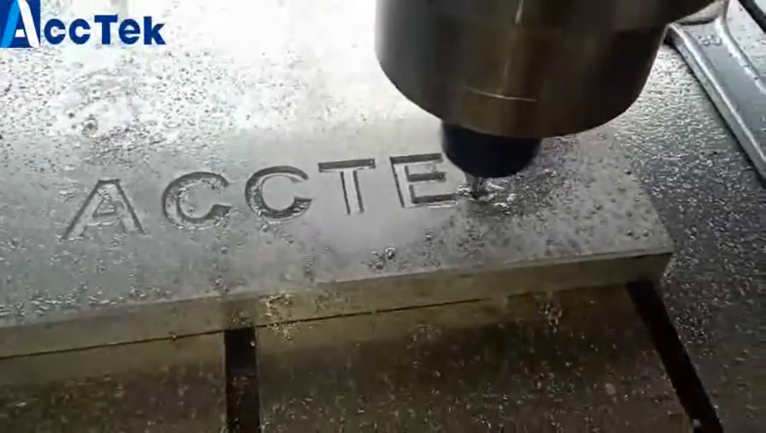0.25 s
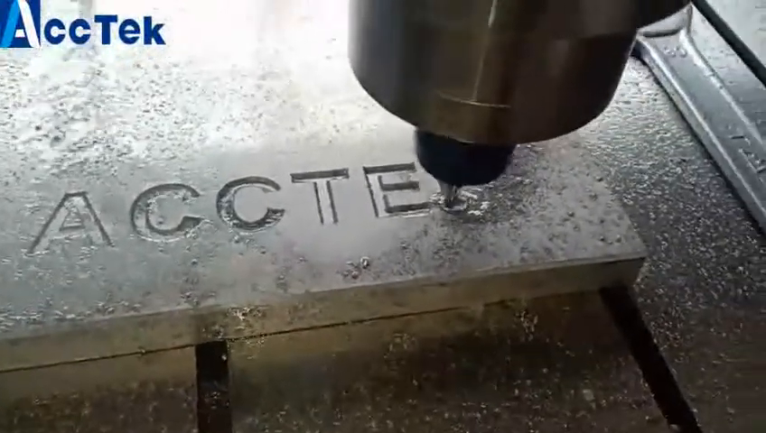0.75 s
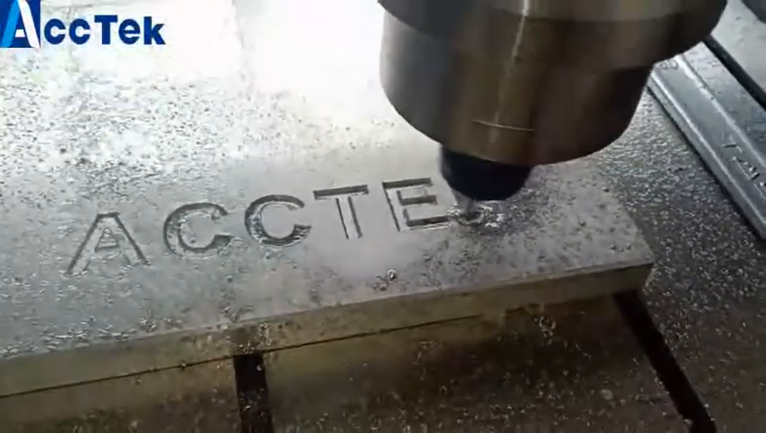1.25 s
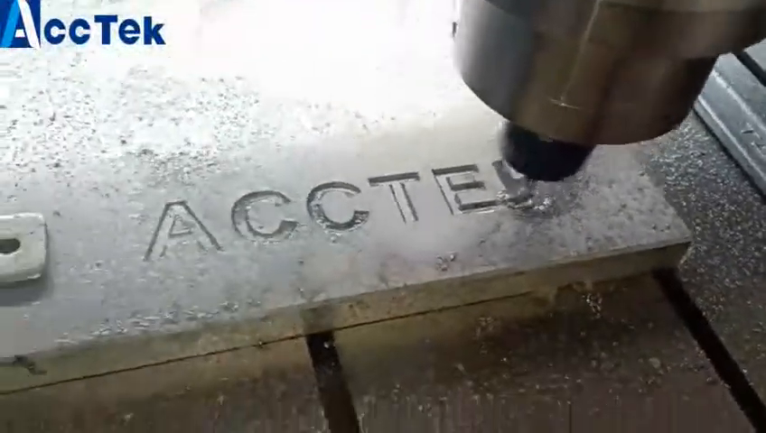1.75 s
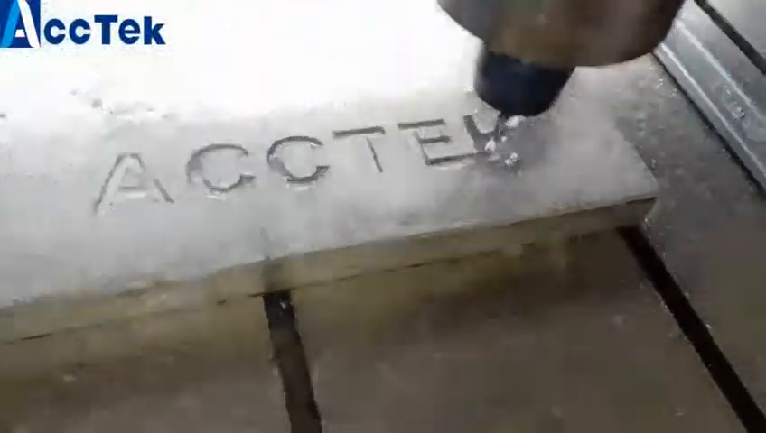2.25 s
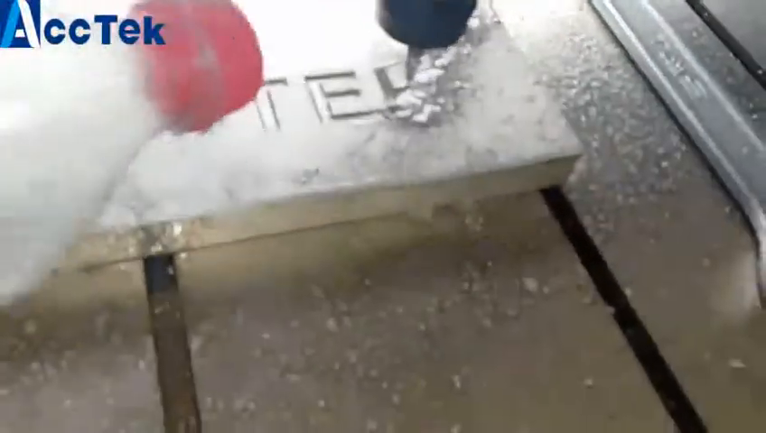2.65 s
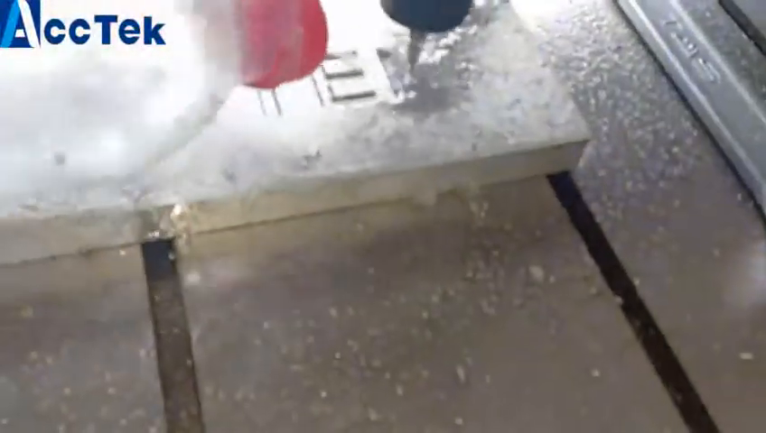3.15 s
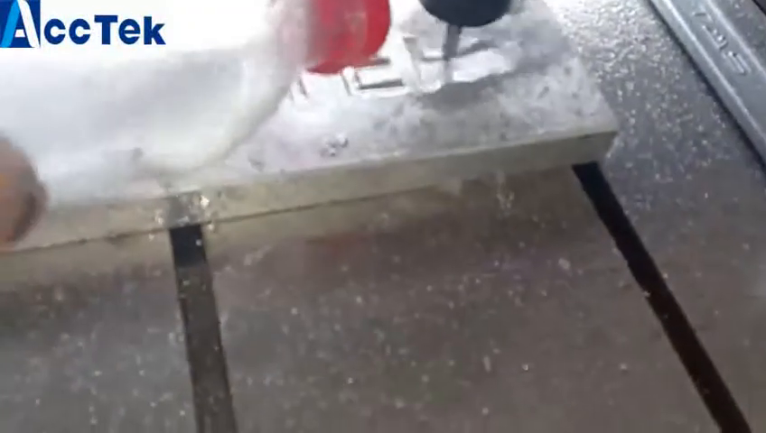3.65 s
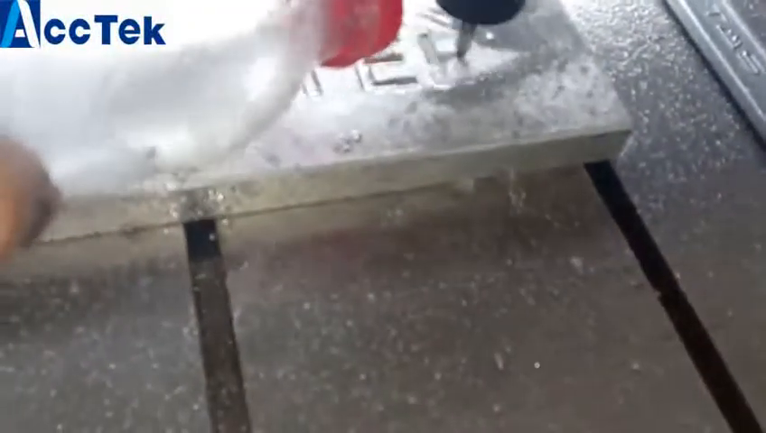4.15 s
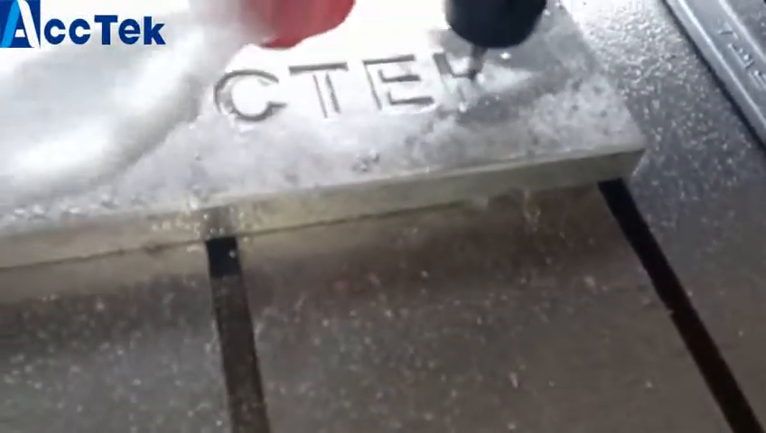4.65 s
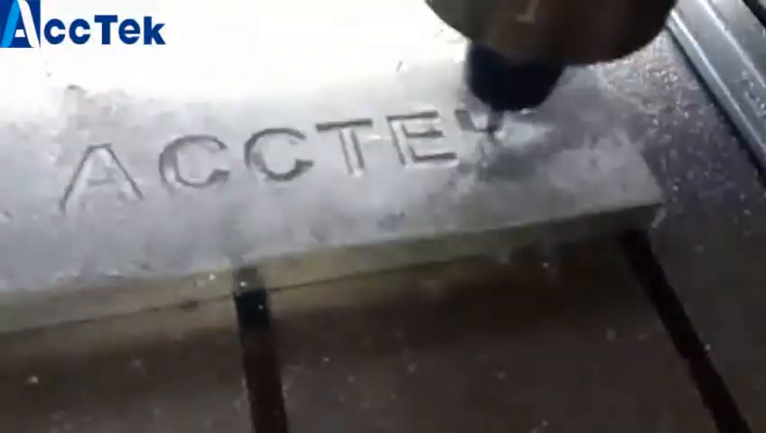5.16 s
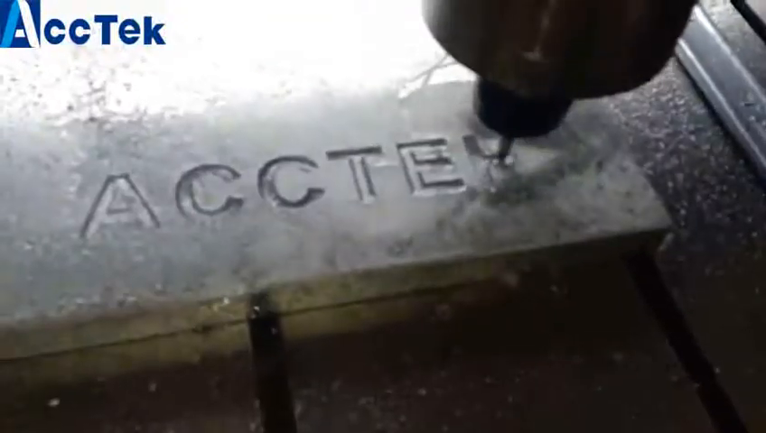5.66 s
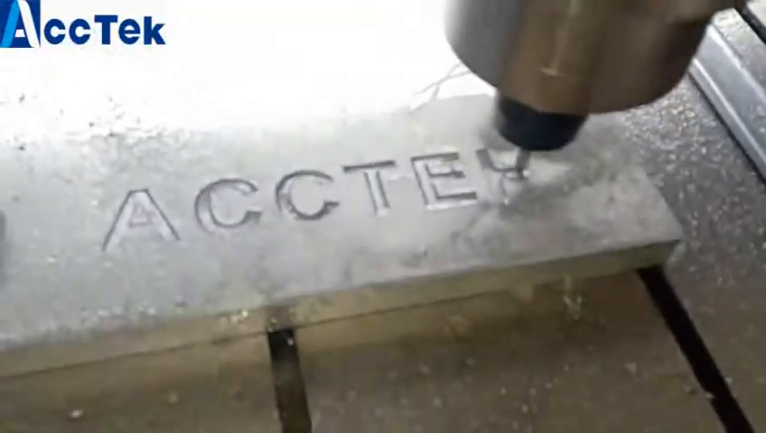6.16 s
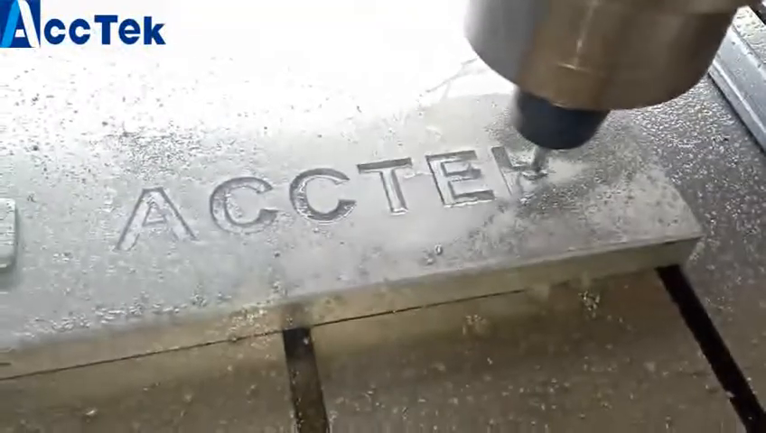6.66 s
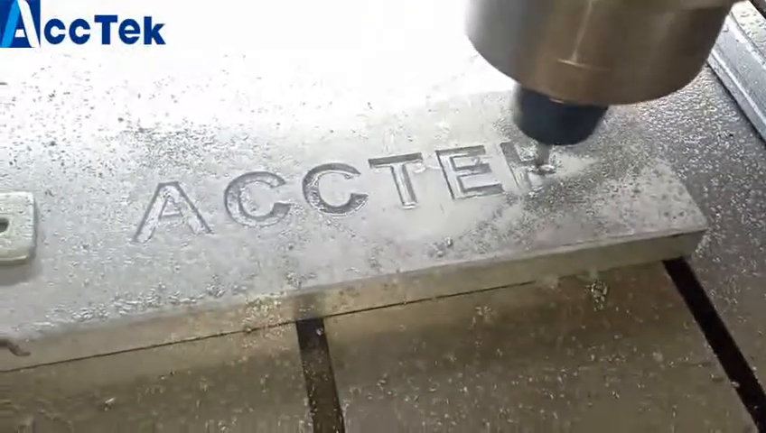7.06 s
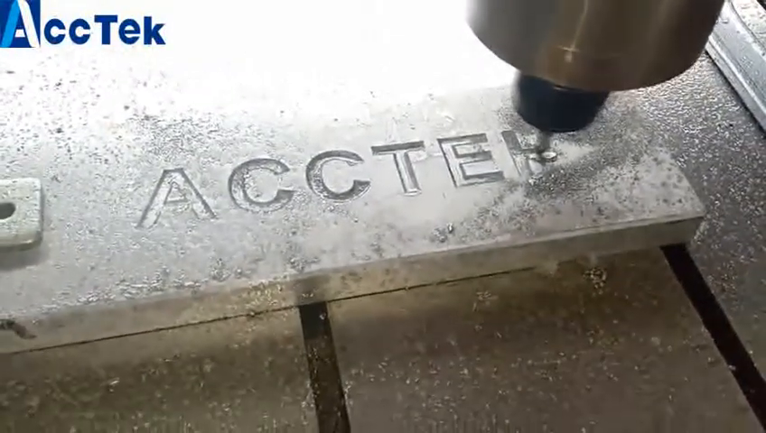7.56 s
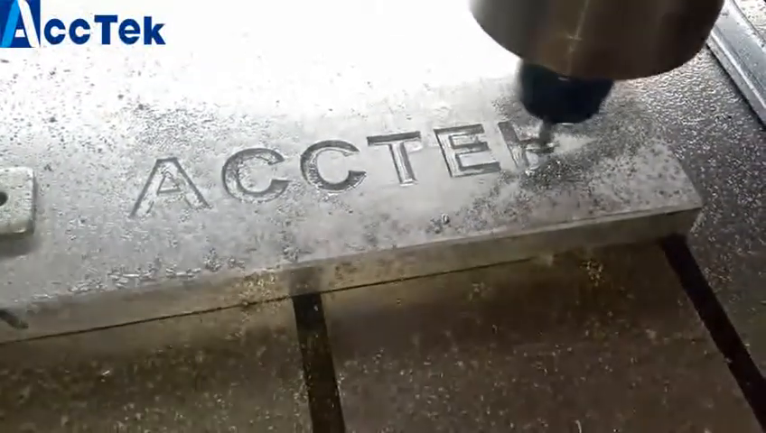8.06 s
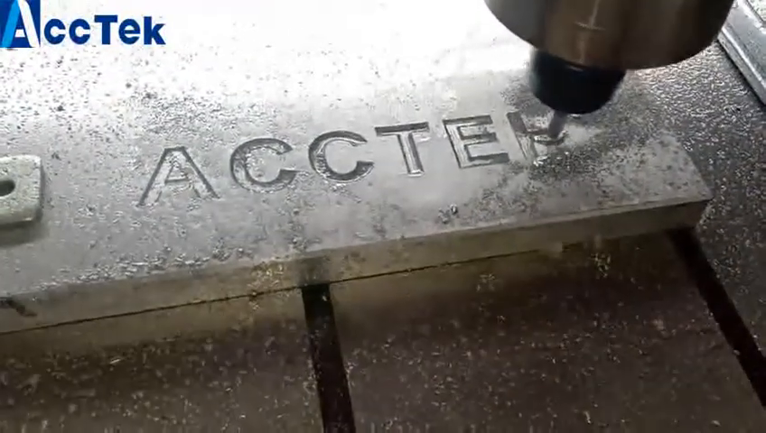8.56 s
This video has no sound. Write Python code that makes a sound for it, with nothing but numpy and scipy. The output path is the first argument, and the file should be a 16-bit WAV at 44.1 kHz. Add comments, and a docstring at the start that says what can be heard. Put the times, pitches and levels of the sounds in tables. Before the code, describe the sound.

Heard from close up, a workshop milling machine cuts back and forth in metal, its steady pitched whine pulsing with raspy scraping about three times a second. The cutting stops briefly while the motor hums and whines on. The cutter bites again with a harsh buzz, snapping chips and spitting coolant, then carries on in slightly louder, regular strokes with dull knocks at the turns.

```python
"""A CNC spindle at 19000 rpm drives a small cutter back and forth through aluminium, heard from close by.
First come six short strokes: tool and gantry (the frame that carries it) sing over a scrape of chips,
and the note sags and thuds in the sideways steps between them. At 1.6 s the tool lifts clear, leaving
cooling air, rumble and electric whine. At 3.2 s it meets the metal with a bark and plunges in with
chatter and a wet hiss. From 4 s the strokes go on to the end."""
import sys
import numpy as np
from scipy import signal
from scipy.fft import rfft, irfft
from scipy.io import wavfile
from scipy.ndimage import uniform_filter1d

SR = 44100
rng = np.random.default_rng(int(sys.argv[2]) if len(sys.argv) > 2 else 0)


def dump_mix(stems):
    """Bounce the given channels to the path in sys.argv[1] as a 16-bit WAV at rate SR."""
    frames = np.atleast_2d(stems).T  # one column per channel
    limited = np.clip(frames, -1, 1)  # hard clip at full scale
    pcm = np.round(limited * 32767).astype(np.int16)
    wavfile.write(sys.argv[1], SR, pcm)


N = 388080
T = np.arange(N) / SR
HZ = np.maximum(np.arange(N // 2 + 1) * SR / N, 1)
SLOW_T = np.arange(N // 40 + 2) * 40 / SR   # a coarse clock for slow changes
APART = np.array([[.5], [-.5]])   # splits a level or phase difference between left and right

# The cutter's tones. An "order" is a tone at a whole multiple of the spindle's turning rate.
# Each row: order, what drives it, level in dB, then extra dB on strokes out (taken off on strokes
# back), between strokes, before the lift and while boring down.
CUTTER_ORDERS = [(1, "shake", -1, 1.17, 0, 1, 0.5), (2, "drone", -4, 1, -0.5, 4.5, 0),
                 (3, "force", 0.47, 1.2, -1.5, 3, -1), (4, "ring", -7.5, 1.36, 0, -2, 7),
                 (5, "ring", 1.6, 0.53, -0.8, 0, -4), (6, "ring", -12.5, -2, 1, -2, 6),
                 (7, "ring", -18, 1.5, 1, 1.5, 9.5), (8, "flank", -5, 1.5, -2.5, 0, 1),
                 (9, "ring", -11.5, -0.6, 1.5, 2.5, 1.5), (10, "ring", -27.5, 2, -3, -2, 0),
                 (13, "ring", -22, 5, -0.5, 0, 5), (14, "scrape", -10.5, 2, -9, 0.5, -1),
                 (15, "ring", -20, -4, -2, -2.5, 0), (18, "ring", -28, -2.5, -2, 5.5, -5)]
# How those tones reach the ears. Each row: order, dB louder on the left, left ear's phase lead in
# radians, extra lead on strokes out (taken off on strokes back), extra lead before the lift.
CUTTER_EARS = [(1, 2, 0.1, -0.9, -0.5), (2, 6, 1.16, 0.15, -0.5), (3, 3, 1.9, 0.8, 1.5),
               (4, -14, -1.5, -0.29, 3), (5, -1, 1.3844, 0.022, -0.16), (6, -2, 0.23, -1.2, -0.8),
               (7, 3.5, -0.86, -1, 0), (8, 0.5, -1.83, -0.46, 0.5), (9, -6.5, 1.76, -0.078, 0.5),
               (10, -1, 1, 0.13, -1), (13, 11, 3, 0.33, -2.1), (14, 6, 0.7, -.3, 0.5),
               (15, 0.5, 3, 0.65, 1.5), (18, 1, 5.5, 0.84, -0.5)]
# The strokes. Each row: start and length in seconds, +1 out or -1 back, force in dB, tool ring in dB.
FEED_STROKES = [(0.019, 0.178, -1, -34, -26), (0.289, 0.18, 1, -30, -23.5), (0.563, 0.19, -1, -32.5, -25.5),
                (0.847, 0.18, 1, -29.5, -23), (1.14, 0.16, -1, -31.5, -21), (1.42, 0.16, 1, -28, -21),
                (3.967, 0.19, 1, -25, -22.5), (4.285, 0.19, -1, -29.5, -21), (4.588, 0.17, 1, -25.5, -21),
                (4.888, 0.21, -1, -26.5, -21.5), (5.183, 0.2, 1, -25.5, -20.5),
                (5.503, 0.21, -1, -26, -19.5), (5.801, 0.19, 1, -25, -20.5),
                (6.125, 0.21, -1, -25.5, -20.5), (6.415, 0.189, 1, -27, -21), (6.739, 0.2, -1, -25.5, -20),
                (7.035, 0.189, 1, -26, -22), (7.345, 0.211, -1, -27.5, -21.5), (7.653, 0.19, 1, -25.5, -21),
                (7.978, 0.21, -1, -26.5, -20.5), (8.273, 0.18, 1, -26.5, -21.5),
                (8.597, 0.2, -1, -28, -21.5)]
# The tool digs in as it turns round. Each row: time in seconds, level in dB.
DIG_THUDS = [(.526, -29), (1.012, -29), (1.08, -28), (1.322, -27.5), (1.377, -31), (1.568, -27),
             (4.189, -24), (4.245, -20.5), (4.793, -22.5), (4.859, -19), (5.153, -26), (5.408, -23),
             (5.47, -22), (5.766, -22), (6.019, -23), (6.085, -21.5), (6.382, -22), (6.639, -23),
             (6.708, -25), (6.997, -24), (7.25, -22), (7.312, -22.5), (7.617, -25), (7.873, -25),
             (7.932, -22), (8.236, -23.5), (8.485, -24), (8.547, -20)]
# Resonances that the chips rasp in. Each row: pitch in Hz, ratio either side at which it has died away,
# level in dB on strokes out, on strokes back and between strokes, dB louder on the left.
CHIP_RASPS = [(1107, 1.3, -12, -4, -8, 0.5), (2710, 1.3, -5.5, -8, -6, 1.5),
              (4380, 2.6, -10.5, -15, -20.5, 7.5), (2610, 1.15, -11, -18, -22, 2),
              (4250, 1.8, -10.5, -24.5, -23, 6)]
# The tool's side rubs. Each row: time in seconds, length in seconds, level in dB.
RUBS = [(1.575, .1, -58), (3.733, .05, -55), (3.8, 0.034, -54), (3.86, 0.047, -49), (4.177, .035, -60),
        (4.55, 0.039, -58), (6.02, 0.07, -56), (6.374, 0.024, -58), (7.26, 0.024, -55), (8.53, 0.045, -57)]
# The shank's squeaking tones. Each row: pitch in Hz, level in dB.
SHANK_MODES = [(6360, 16.5), (5500, 18)]
# The cutting edges brush the wall on the way up. Each row: order, level in dB.
LIFT_ORDERS = [(2, -49.5), (3, -31.5), (4, -42), (5, -47), (6, -45)]
# The free spindle's wavering once-a-turn hum. Each row: time in seconds, level in dB.
SPINDLE_HUM = [(1.68, -38), (1.73, -34), (1.84, -34), (1.91, -41.5), (2.03, -42), (2.12, -36),
               (2.22, -34.5), (2.41, -43), (2.5, -34), (2.68, -45), (2.82, -34.5), (3.05, -44)]
# The bark on touching the metal. Each row: order, level in dB, left ear's lead in radians.
BARK_ORDERS = [(2, -26, 0.074), (4, -30, -1.5), (5, -27.5, 1), (6, -28, 0.94), (7, -38, -.7),
               (8, -36.5, -1.8), (9, -35, 0.87), (10, -41, 1)]
# Boring down. Each row: time in seconds, then once-a-turn shake, gantry drone, tool ring, scrape in dB.
BORING_LEVELS = [(3.2, -51, -54, -45, -31), (3.244, -20, -39, -47, -28), (3.275, -25, -33, -37, -31),
                 (3.315, -19.5, -29, -37, -28), (3.37, -34, -27, -37, -33), (3.445, -31, -19, -34, -32),
                 (3.51, -24, -24, -40, -33), (3.54, -36, -32, -37, -32.5), (3.64, -23, -26, -34, -31.5),
                 (3.675, -27, -34, -33, -32), (3.73, -24, -27, -31.5, -30.5), (3.88, -31, -19.5, -32, -28),
                 (3.95, -25.5, -25.5, -34, -34)]
# The plunge's own sounds. Each row: time in seconds, then wet hiss, chatter, snapping chips in dB.
PLUNGE_LEVELS = [(3.25, -57, -75, -63), (3.275, -33, -44, -36), (3.31, -26, -31, -30),
                 (3.36, -25, -24, -30), (3.395, -26.5, -26.5, -34), (3.415, -26.5, -25, -26),
                 (3.47, -29, -27, -35), (3.535, -35.5, -28, -43), (3.58, -31, -33, -35),
                 (3.63, -32, -36, -41), (3.68, -57, -67, -58), (3.78, -45, -58, -36),
                 (3.88, -41, -58, -31.5), (3.92, -44, -65, -37), (3.96, -70, -75, -70)]
# Chatter tones. Each row: the order it lies CHATTER_HZ above, level in dB.
CHATTER_TONES = [(0, -18.5), (1, -11), (2, -12), (4, -18), (7, -22.5)]
# The tool's high tones, struck by snapping chips. Each row: pitch in Hz, level in dB.
TOOL_MODES = [(2300, -2.5), (3700, 4.5), (4400, 5.5), (4900, -5), (5500, -9.5), (6400, -8), (11500, -17),
              (13000, -19), (14300, -15)]
# The running machine. Each row: time in seconds, frame rumble in dB, inverter whine in dB.
MACHINE_LEVELS = [(0.0, -48, -73), (1.1, -51, -60), (1.5, -45, -50), (1.87, -50.5, -51.5),
                  (1.99, -45.5, -48), (2.3, -42.5, -43.5), (2.45, -42, -46.5), (2.65, -49, -45),
                  (2.92, -38, -39), (3.07, -40, -42), (3.19, -46, -38), (3.5, -51, -45), (4.3, -45.5, -52),
                  (5.1, -48, -44), (5.6, -46.5, -52.5), (6.8, -41.5, -49.5), (7.2, -48, -47),
                  (8.79, -43.5, -53)]
# The rotor's whine swells as the head moves through standing waves.
# Each row: time in seconds, left level in dB, right level in dB.
SLOT_WHINE = [(0.0, -55, -45), (0.4, -41, -37), (0.85, -53.5, -58), (1.45, -58, -47.5), (1.75, -41, -36),
              (2.1, -35.5, -53), (2.45, -52.5, -39.5), (3.05, -32.5, -60), (3.45, -52.5, -62),
              (4.55, -44.5, -37.5), (5.0, -38.5, -43), (5.6, -43, -51.5), (6.45, -56, -58),
              (7.0, -50.5, -45.5), (7.75, -47, -37.5), (8.8, -48, -43.5)]
# Thin tones of the inverter (the motor's power supply). Each row: pitch in Hz, level in dB. # DRIVE_TONES holds
# further thin tones, the low ones from the motor and the highest ones (10000, 11028, # 14048 Hz) from the
# inverter's switching. Same columns.
INVERTER_TONES = [(4365, -24), (4683, -4.5), (4926, -19), (5072, -22.5), (5318, -15)]
DRIVE_TONES = [(634, -51), (2171, -56), (3019, -57.5), (10000, -69.5), (11028, -60.5), (12300, -70),
               (12930, -67.5), (13410, -64.5), (14048, -56)]
# The colours of four noises. Each row: frequency in Hz, relative level in dB.
SCRAPE_COLOUR = [(90, -105), (170, -79.5), (400, -68.5), (560, -74), (860, -70), (1130, -66), (1400, -76),
                 (1750, -64), (2100, -68), (2400, -69.5), (2850, -70), (3250, -74.5), (3800, -73.5),
                 (4900, -71.5), (5700, -77), (6600, -80.5), (7600, -106), (9000, -95), (13000, -92.5),
                 (15500, -105)]
HISS_COLOUR = [(90, -105), (300, -75), (1200, -66), (2200, -57.5), (3400, -73), (4900, -60), (6400, -75.5),
               (8000, -88), (10500, -91.5), (13400, -78), (15500, -76.5)]
RUMBLE_COLOUR = [(25, -35), (70, -10), (105, 1), (145, 11), (185, 2.5), (230, -7), (400, -79)]
AIR_COLOUR = [(100, -105), (260, -63), (400, -65.5), (900, -69.5), (3000, -69), (4900, -68), (5500, -75.5),
              (6300, -78.5), (7500, -106), (12000, -96.5), (13000, -77.5), (14000, -82.5), (15500, -106)]
# Noise bouncing off the machine bed.
# Each row: frequency in Hz, how alike the ears are from 0 to 1, left ear's lead in radians.
BED_REFLECTIONS = [(140, .99, 0), (400, 0.83, -.5), (920, 0.3, -1.5), (1124, 1, 1), (1390, 0.5, 2.5),
                   (2000, 0, -0.7), (2490, 0.6, -1.34), (3600, 0.01, -0.9), (4460, 0.34, 2.5),
                   (5200, 0.39, 1.5), (15000, 0.1, 5.5)]

SPINDLE_HZ, CHATTER_HZ = 317.15, 149.3
LIFT_S, TOUCH_S, BORED_S = 1.645, 3.212, 3.96   # the tool leaves the metal, meets it, reaches its depth
EDGE_S, FORCE_LAG_S = 0.028, 0.041   # the ring starts and stops this fast; the force trails the feed
STEP_RING_DB, STEP_SHAKE_DB, STEP_SCRAPE_DB = -8, -4, 1.5   # changes while stepping sideways
CORNER_S, CORNER_WIDTH_S, CORNER_RING_DB = 0.016, 0.0075, -1.5   # a halt just before and after a stroke
RING_SWELL_DB, RING_PEAK_S, RING_SWELL_S = 0.5, 0.046, 0.11   # the ring swells early in a stroke
SLACK_OUT_S, SLACK_BACK_S, SLACK_WIDTH_S = -0.01, 0.012, 0.0086   # the load eases near a stroke's start
SLACK_OUT_DB, SLACK_BACK_DB = -4.5, -7
FLANK_DB = 4.5   # the tool's side rubs harder after a stroke out, less after a stroke back
USUAL_FORCE_DB, SHAKE_DB, SCRAPE_DB = -24.5, -25.5, -33
SHAKE_FOLLOWS, SCRAPE_FOLLOWS = 0.44, 0.51   # shares of the force's swing in dB
RESONANT_ORDERS, RESONANT_CALM = (5, 9), .55   # the tool's resonances cut their flutter to this share
LOW_ORDER_CALM = .45   # the heavy gantry does the same for orders 1 and 2
ROCK_HZ, ROCK_LAG_S, ROCK_T60_S, ROCK_THROB = 27, 0.0016, .6, .25   # T60: time to fade by 60 dB
CHIP_FLUTTER_DB, CHIP_FLUTTER_PER_S = 1.0, 28
BORING_RASP_DB, BORING_BITE = -4.5, 0.21   # boring down, chips rasp less and tear off more sharply
LIFT_FADE_DB_PER_S = 49
BARK_S, BARK_ATTACK_S, BARK_END_S, BARK_RELEASE_S = 3.203, 0.029, 3.258, 0.005
SNAPS_PER_S, SNAP_SPREAD_DB, SNAP_T60_S = 600, 2, .005
INVERTER_USUAL_DB, INVERTER_PAN_DB, INVERTER_FADE_DB = -52, 8, 2   # standing waves fade it at each ear
MOTOR_FOLLOWS, AIR_FOLLOWS = 0.32, 0.33   # shares of the inverter's swell in dB
CUTOFF_HZ = 15600


def cutter(angle, direction, stepping, drives, low_rough, high_rough, rough_rate, step_rough,
           swing_rad, sway_rad, flutter_rad, rock_rad):
    """The biting edges make tool and gantry sing; the force swings round whenever the feed reverses."""
    rock = rocking(kick=.4, tremor=0.3)
    unsteady = 1 + step_rough * stepping
    before_lift, boring = smooth(T < LIFT_S, EDGE_S), boring_down()
    out = np.zeros((2, N))
    for levels, placing in zip(CUTTER_ORDERS, CUTTER_EARS):
        order, drive, db, stroke_db, step_db, early_db, boring_db = levels
        _, pan_db, lead, stroke_lead, early_lead = placing
        calm = RESONANT_CALM + (1 - RESONANT_CALM) * stepping if order in RESONANT_ORDERS else 1
        calm = LOW_ORDER_CALM if order <= 2 else calm
        rough = (low_rough * unsteady if order < 6 else high_rough) * calm
        swing = swing_rad * order ** 0.7 * smooth(direction, length_s=0.027)
        phase = order * angle + swing + rock_rad * rock / order
        # the moving head shifts the sound between the ears
        wander = min(order / 2, 1) * (sway_rad * drift(2.04) + calm * flutter_rad * drift(15.0))
        left_lead = lead + stroke_lead * direction + early_lead * before_lift + wander
        ears = unit_power(from_db(pan_db * APART))
        db = db + stroke_db * direction + step_db * stepping + early_db * before_lift + boring_db * boring
        throb = 1 + ROCK_THROB * rock / order ** 2
        level = drives[drive] * from_db(db) * throb
        out += ears * level * tone(phase + left_lead * APART, rough, rough_rate)
    return out


def feed():
    """The tool's travel: its direction, when it is between strokes, and how hard it drives each sound."""
    start, length, side, force_db, ring_db = np.transpose(FEED_STROKES)
    end = start + length
    stepping = smooth(np.searchsorted(start, T) == np.searchsorted(end, T), EDGE_S)
    corners = bumps(np.append(start - CORNER_S, end + CORNER_S), CORNER_WIDTH_S)
    last_side = side[np.maximum(np.searchsorted(end, T) - 1, 0)]
    load_db = smooth(held(force_db, FORCE_LAG_S), EDGE_S)
    extra_db = load_db - USUAL_FORCE_DB
    swell_db = RING_SWELL_DB * (bumps(start + RING_PEAK_S, RING_SWELL_S) - .5)
    slack_db = SLACK_OUT_DB * bumps(start[side > 0] + SLACK_OUT_S, SLACK_WIDTH_S)
    slack_db += SLACK_BACK_DB * bumps(start[side < 0] + SLACK_BACK_S, SLACK_WIDTH_S)
    milling_db = {"shake": SHAKE_DB + SHAKE_FOLLOWS * extra_db + STEP_SHAKE_DB * stepping + slack_db,
                  "drone": load_db + slack_db,
                  "ring": held(ring_db) + STEP_RING_DB * stepping + CORNER_RING_DB * corners + swell_db,
                  "scrape": SCRAPE_DB + SCRAPE_FOLLOWS * extra_db + STEP_SCRAPE_DB * stepping}
    milling = smooth((T < LIFT_S) | (T > BORED_S), length_s=0.034)
    boring, digs = boring_down(), thuds()
    drives = {name: milling * from_db(db) + boring * boring_gain
              for (name, db), boring_gain in zip(milling_db.items(), gains(BORING_LEVELS))}
    drives["shake"] = np.sqrt(drives["shake"] ** 2 + digs ** 2 + gains(SPINDLE_HUM)[0] ** 2)
    drives["force"] = drives["drone"]   # the steady cutting force, without the thuds
    drives["drone"] = np.hypot(drives["drone"], from_db(-3.5) * digs)   # takes a share of each thud
    drives["flank"] = drives["scrape"] * from_db(FLANK_DB * milling * stepping * smooth(last_side, EDGE_S))
    return held(side), stepping, drives


def rocking(kick, tremor):
    """The gantry swings on its bearings, kicked by each stop and trembling a little throughout."""
    swing = 0
    for start, length, side, _, _ in FEED_STROKES:
        since = np.maximum(SLOW_T - start - length - ROCK_LAG_S, 0)
        swing += side * np.sin(2 * np.pi * ROCK_HZ * since) * from_db(-60 * since / ROCK_T60_S)
    trembling = tone(2 * np.pi * ROCK_HZ * T, rough=1.0, rate=1.4)
    return kick * np.interp(T, SLOW_T, swing) + tremor * trembling


def thuds(width_s=.024):
    """Each dig of the tool briefly swells the lowest tones."""
    return sum(from_db(db) * bumps([s], width_s) for s, db in DIG_THUDS)


def chips(angle, direction, stepping, level, scrape_db, bite_depth, grit_db):
    """Chips tear off in bursts, once a turn; the direction of travel picks the resonances that rasp."""
    boring = boring_down()
    bite = unit_power(1 + (bite_depth + BORING_BITE * boring) * cos(angle))
    flutter = from_db(CHIP_FLUTTER_DB * drift(CHIP_FLUTTER_PER_S))
    outward = (1 + direction) / 2
    out = from_db(scrape_db) * noise(SCRAPE_COLOUR)
    for hz, spread, out_db, back_db, step_db, pan_db in CHIP_RASPS:
        stroke_db = outward * out_db + (1 - outward) * back_db
        rasp_db = (1 - stepping) * stroke_db + stepping * step_db + BORING_RASP_DB * boring
        rasp = noise([(hz / spread, -50), (hz, 0), (hz * spread, -50)])
        out += from_db(rasp_db + grit_db * drift(90) + pan_db * APART) * rasp
    return level * bite * flutter * out


def plunge(angle, grit_db, beat_db, spray_db):
    """Boring down, both edges beat hard; the tool chatters, snaps off chips and spits coolant."""
    hiss, chatter, snapping = gains(PLUNGE_LEVELS)
    wobble = 2 * np.pi * CHATTER_HZ * T
    tones = sum(from_db(db) * tone(order * angle + wobble, rough=0.23, rate=14)
                for order, db in CHATTER_TONES)
    beating = from_db(beat_db) * tone(2 * angle, rough=0.42, rate=24)
    spray = from_db(spray_db) * noise(HISS_COLOUR)
    spray *= unit_power((1 + 0.11 * cos(wobble)) * from_db(grit_db * drift(150)))
    spray *= unit_power(from_db(2.0 * drift(220)))   # it leaves the tool in short spits
    return hiss * spray + snapping * snaps(angle) + chatter * (tones + beating)


def snaps(angle):
    """Chips break at random, mostly as an edge bites, and ring the tool briefly."""
    breaks = rng.random(N) < SNAPS_PER_S * (1 + cos(2 * angle)) / SR
    clicks = breaks * from_db(SNAP_SPREAD_DB * np.minimum(rng.exponential(1, N), 3))
    decay = from_db(-60 / (SNAP_T60_S * SR))
    out = np.zeros((2, N))
    for hz, db in TOOL_MODES:
        step_rad = 2 * np.pi * hz / SR
        struck = np.zeros((2, N))
        struck[:, breaks] = clicks[breaks] * rng.standard_normal((breaks.sum(), 2)).T
        feedback = [1, -2 * decay * np.cos(step_rad), decay * decay]
        ringing = signal.lfilter([0, np.sin(step_rad)], feedback, struck + 1e-18)
        soften = signal.butter(1, [hz * .85, hz * 1.15], "band", fs=SR, output="sos")
        out += from_db(db) * signal.sosfilt(soften, ringing)
    return unit_power(out)


def bark(angle, rough):
    """The tip skids on the bare surface and sounds many orders at once, until it bites."""
    rise = np.clip((T - BARK_S) / BARK_ATTACK_S, 0, 1)
    fall = np.exp(-np.maximum(T - BARK_END_S, 0) / BARK_RELEASE_S)
    skid = angle + rough * drift(40)
    tones = sum(from_db(db) * cos(order * skid + rng.uniform(0, 2 * np.pi) + lead * APART)
                for order, db, lead in BARK_ORDERS)
    return rise * fall * np.sqrt(2) * tones


def withdrawal(angle, lead_rad):
    """The edges brush the wall ever more lightly as the tool rises out of its groove."""
    fade = smooth(T > LIFT_S, EDGE_S) * from_db(-LIFT_FADE_DB_PER_S * np.maximum(T - LIFT_S, 0))
    return fade * sum(from_db(db) * tone(order * angle + lead_rad * APART, rough=0.18, rate=13)
                      for order, db in LIFT_ORDERS)


def squeaks():
    """Short rubs make the tool's shank ring high."""
    swell = sum(from_db(db) * np.exp(-(2 * (T - s) / length) ** 2) for s, length, db in RUBS)
    ears = [sum(from_db(db) * tone(2 * np.pi * hz * T, rough=0.51, rate=48) for hz, db in SHANK_MODES)
            for ear in range(2)]
    return swell * np.array(ears)


def machine(angle, rumble_db, air_db, slot_db, inverter_db, pan_db):
    """The frame rumbles, cooling air blows, and the motor, its 22 rotor slots and the inverter whine."""
    rumble, inverter = gains(MACHINE_LEVELS)
    slot_phase = 22 * angle + APART * (-.8 + .4 * drift(1))
    whine = from_db(slot_db) * np.array(gains(SLOT_WHINE)) * tone(slot_phase, rough=0.2, rate=17.4)
    switching = sum(from_db(db) * tone(2 * np.pi * hz * T + APART, rough=.17, rate=6)
                    for hz, db in INVERTER_TONES)
    motor = sum(from_db(db) * tone(2 * np.pi * hz * T + APART * (1.6 + .5 * drift(1)), rough=.15, rate=6)
                for hz, db in DRIVE_TONES)
    swell = inverter / from_db(INVERTER_USUAL_DB)
    fade_db = INVERTER_FADE_DB * np.array([drift(3.9), drift(2.6)])
    switching *= inverter * from_db(inverter_db + INVERTER_PAN_DB * APART + fade_db)
    frame = from_db(rumble_db) * rumble * noise(RUMBLE_COLOUR)
    air = from_db(air_db) * swell ** AIR_FOLLOWS * noise(AIR_COLOUR)
    return frame + whine + switching + (air + swell ** MOTOR_FOLLOWS * motor) * from_db(pan_db * APART)


def boring_down():
    """1 while the tool bores down into the metal, else 0."""
    return smooth((T > TOUCH_S) & (T < BORED_S), length_s=0.0076)


def held(values, lag_s=0):
    """One value a stroke, held along it and then gliding to the next."""
    start, length = np.transpose(FEED_STROKES)[:2]
    corners = np.column_stack([start - CORNER_S, start + length + CORNER_S]).ravel()
    return np.interp(T - lag_s, corners, np.repeat(values, 2))


def tone(phase, rough, rate):
    """A tone whose level and phase waver at random."""
    start = rng.uniform(0, 2 * np.pi)
    return unit_power((1 + rough * drift(rate)) * cos(phase + start + rough * drift(rate)))


def noise(colour):
    """Stereo noise; reflections off the machine bed make the ears differ above the bass."""
    def across(rows):
        hz, *columns = np.transpose(rows)
        return [np.interp(np.log(HZ), np.log(hz), column) for column in columns]
    db, = across(colour)
    alike, lead = across(BED_REFLECTIONS)
    alike = np.clip(alike, 0, 1)
    shared, left, right = rfft(rng.standard_normal((3, N)))
    common = np.sqrt(alike) * shared * np.exp(1j * lead * APART)
    separate = np.sqrt(1 - alike) * np.array([left, right])
    return unit_power(irfft((common + separate) * from_db(db), N))


def drift(rate):
    """A random wander of about 1 either way, moving about `rate` times a second."""
    decay = np.exp(-80 * np.pi * rate / SR)
    kicks = rng.standard_normal(len(SLOW_T) + 2000)
    wander = signal.lfilter([1], [1, -2 * decay, decay * decay], kicks)[2000:]
    return np.interp(T, SLOW_T, unit_power(wander))


def bumps(times, width_s):
    """A smooth bump of height 1 at each time."""
    return np.interp(T, SLOW_T, sum(np.exp(-((SLOW_T - s) / width_s) ** 2) for s in times))


def smooth(x, length_s):
    """Moving average: steps become ramps."""
    return uniform_filter1d(np.asarray(x, float), max(int(length_s * SR), 1))


def gains(rows):
    """Each dB column of a timed table as a gain per sample."""
    times, *columns = np.transpose(rows)
    return [from_db(np.interp(T, times, column)) for column in columns]


def from_db(db):
    """Decibels to gain."""
    return 10 ** (np.asarray(db) / 20)


def unit_power(x):
    """Scale to an average power of 1."""
    return x / np.sqrt(np.mean(np.abs(x) ** 2) + 1e-20)


def cos(phase):
    """Cosine of a long-running phase."""
    turns = phase / (2 * np.pi)
    return np.cos((2 * np.pi * (turns - np.floor(turns))).astype(np.float32))


def scene():
    """One spindle angle times everything that turns."""
    angle = 2 * np.pi * np.cumsum(SPINDLE_HZ + 0.11 * drift(1.55)) / SR
    direction, stepping, drives = feed()
    singing = cutter(angle, direction, stepping, drives, low_rough=0.17, high_rough=0.38, rough_rate=19.6,
                     step_rough=1.73, swing_rad=0.53, sway_rad=0.33, flutter_rad=0.15, rock_rad=0.3)
    scraping = chips(angle, direction, stepping, drives["scrape"],
                     scrape_db=.5, bite_depth=0.29, grit_db=1.5)
    running = machine(angle, rumble_db=0.5, air_db=-41.0, slot_db=1.5, inverter_db=4.5, pan_db=2.5)
    touching = bark(angle, rough=0.072)
    lifting = withdrawal(angle, lead_rad=1.83)
    plunging = plunge(angle, grit_db=-1.5, beat_db=-3.5, spray_db=3.0)
    return singing + scraping + plunging + touching + lifting + squeaks() + running


def record(dry):
    """The highest treble is cut steeply."""
    return signal.sosfilt(signal.ellip(12, .2, 80, CUTOFF_HZ, fs=SR, output="sos"), dry)


dry = scene()
out = record(dry)
dump_mix(out)
```